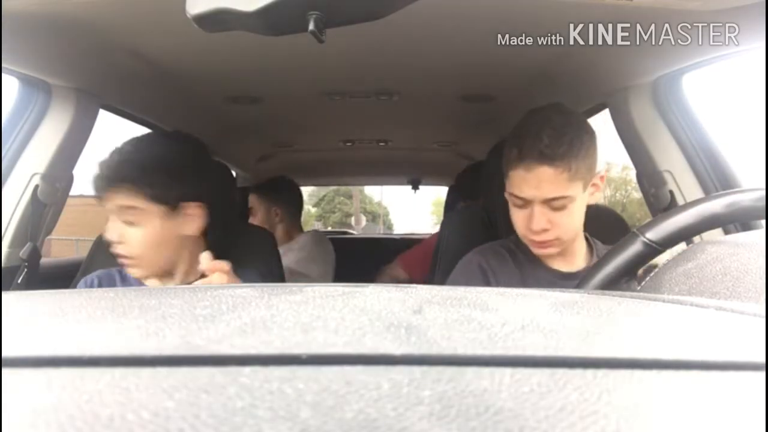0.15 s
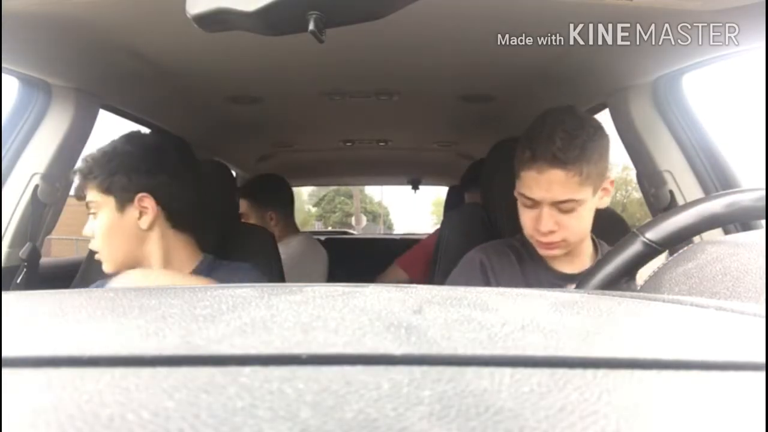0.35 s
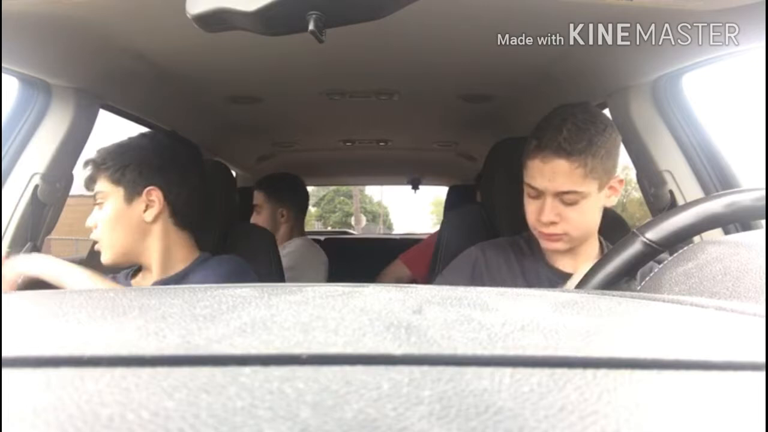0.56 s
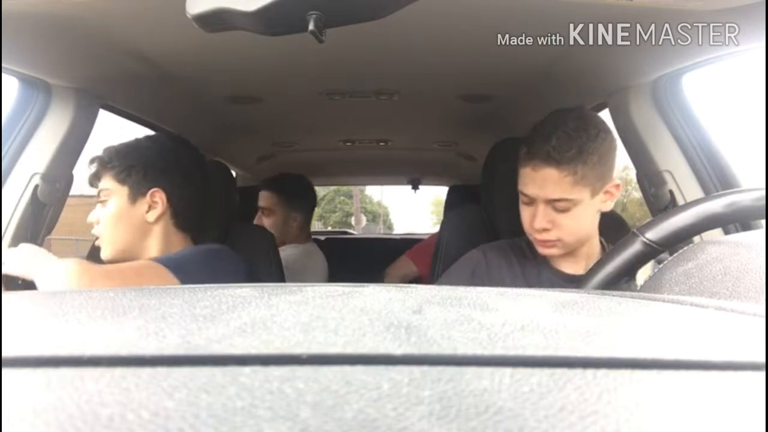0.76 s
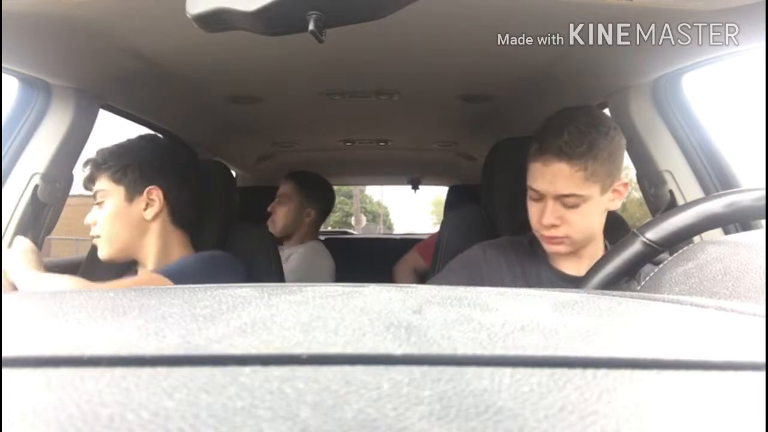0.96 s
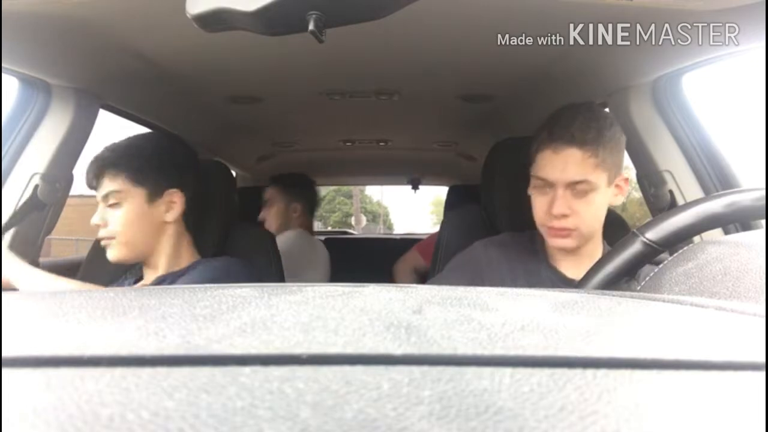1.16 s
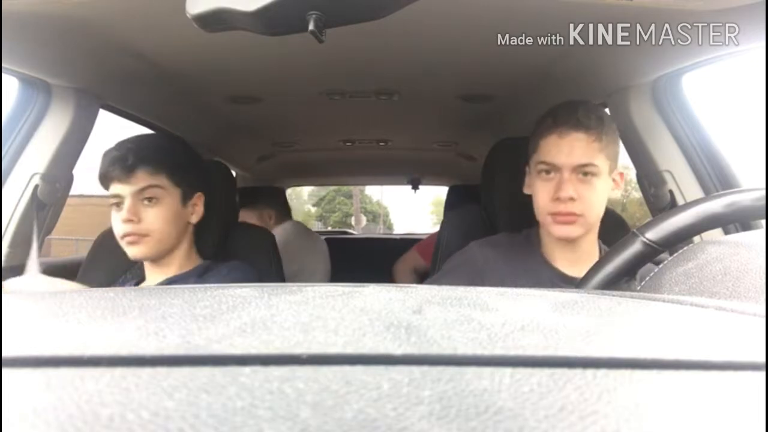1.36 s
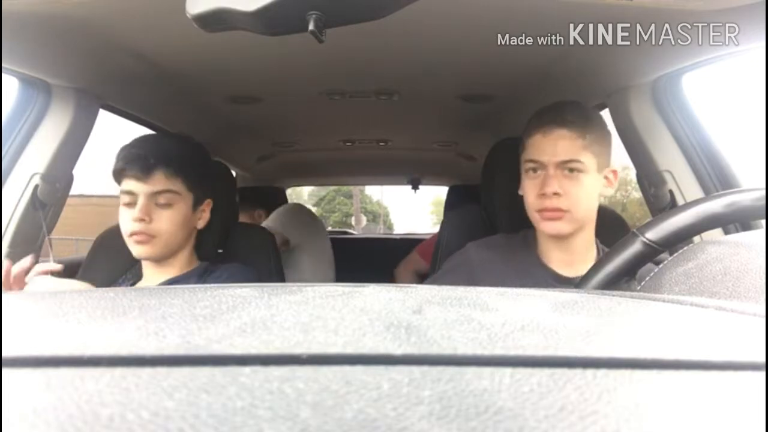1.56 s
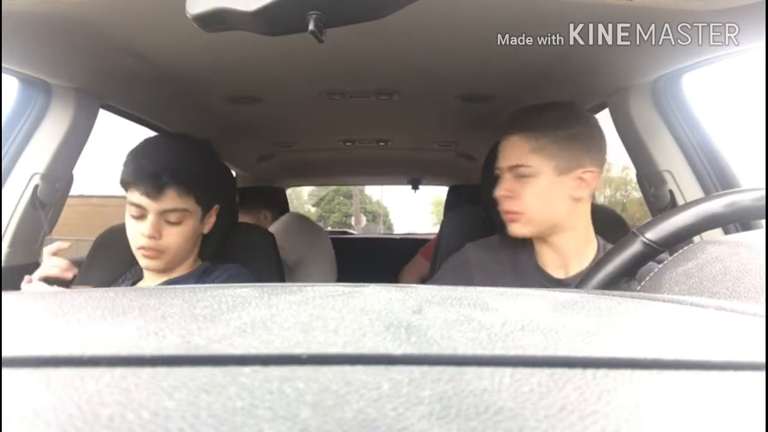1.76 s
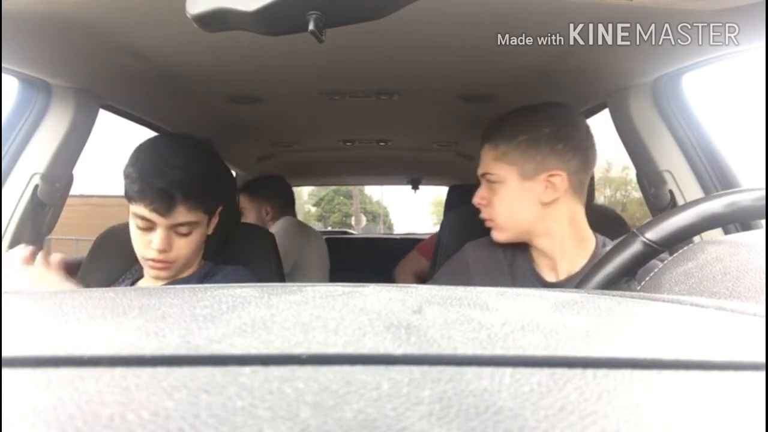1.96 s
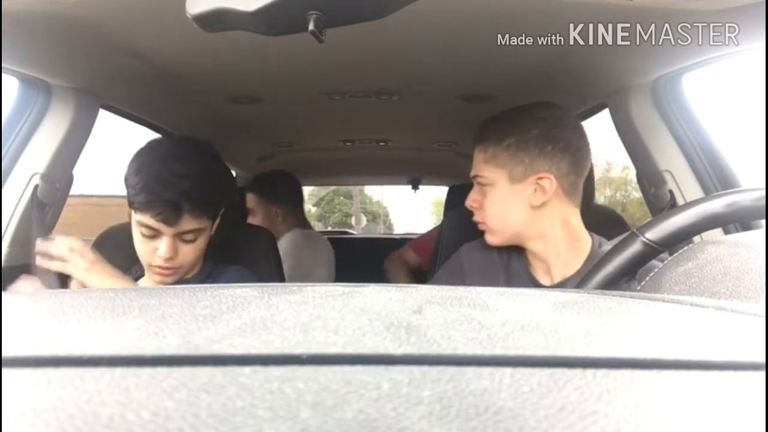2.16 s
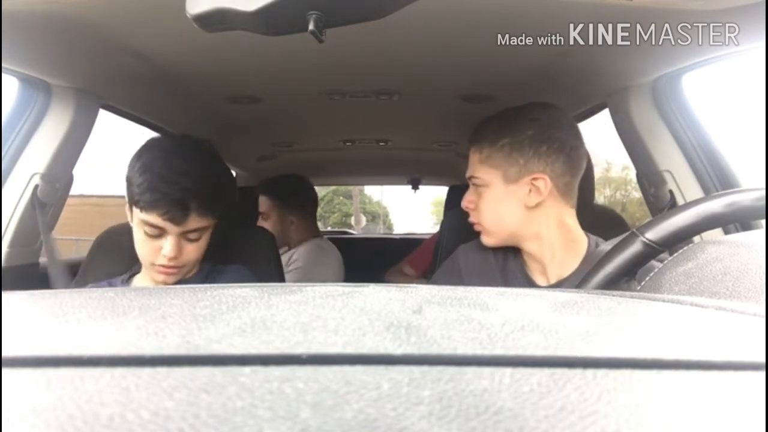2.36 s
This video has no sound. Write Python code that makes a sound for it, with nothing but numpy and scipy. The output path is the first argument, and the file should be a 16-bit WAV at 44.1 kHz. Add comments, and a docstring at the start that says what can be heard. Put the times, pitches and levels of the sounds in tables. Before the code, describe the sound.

Soft thumps and plastic knocks as people shift and pull seatbelts in a parked car.

```python
"""People shift in their seats in a parked car and pull out their seatbelts, over a steady low rumble.
At 0.2 s a soft thump rings the trim panels and booms in the closed cabin; light plastic knocks follow.
Near 0.5 s come a faint belt pull and a second thump; at 1.1 s, a third and a short rasp of webbing
jerking off its reel. From 1.3 to 2.3 s four more thumps fall among knocks and small buckle clicks."""
import sys
import numpy as np
from scipy.fft import rfft, irfft, next_fast_len
from scipy.io import wavfile
from scipy.ndimage import uniform_filter1d, minimum_filter1d, map_coordinates

SR = 44100
rng = np.random.default_rng(int(sys.argv[2]) if len(sys.argv) > 2 else 0)


def to_wav(s):
    """Save 16-bit WAV."""
    ch = np.atleast_2d(s).T  # columns
    pcm = np.round(np.clip(ch, -1, 1) * 32767)  # PCM
    wavfile.write(sys.argv[1], SR, pcm.astype(np.int16))


N = 112455
EVENT_N = SR // 2
EVENT_TIME_S = np.arange(EVENT_N) / SR


def amp(db):
    """Decibels to gain."""
    return 10 ** (np.asarray(db) / 20)


def unit_rms(x):
    """Scale to rms 1."""
    return x / np.sqrt(np.mean(x ** 2) + 1e-20)


def filtered(x, response):
    """Apply a frequency response, given as a function of Hz."""
    size = next_fast_len(len(x) + 8192)
    hz = np.fft.rfftfreq(size, 1 / SR)
    return irfft(rfft(x, size) * response(hz), size)[:len(x)]


def noise(spectrum, size):
    """Noise of rms 1, coloured by (Hz, dB) points on a log frequency axis."""
    points_hz, points_db = np.transpose(spectrum)
    colour = lambda hz: amp(np.interp(np.log(hz + 1), np.log(points_hz + 1), points_db))
    return unit_rms(filtered(rng.standard_normal(size), colour))


def envelope(rise_s, t60_s):
    """Soft rise, exponential decay."""
    rise = 1 - np.exp(-(EVENT_TIME_S / rise_s) ** 2)
    return rise * np.exp(-np.log(1000) * EVENT_TIME_S / t60_s)


def ring(modes, rise_s, pitch=1):
    """Damped modes of alternating sign, each varying by about 1 dB per blow."""
    out = np.zeros(EVENT_N)
    for k, (frequency, db, t60_s) in enumerate(modes):
        gain = (-1) ** k * amp(db + rng.standard_normal())
        out += gain * envelope(rise_s, t60_s) * np.sin(2 * np.pi * frequency * pitch * EVENT_TIME_S)
    return out


def burst(spectrum, rise_s, t60_s):
    """Decaying puff of coloured noise."""
    return noise(spectrum, EVENT_N) * envelope(rise_s, t60_s)


def add(out, time_s, x):
    """Mix x into out at time_s."""
    part = out[max(round(time_s * SR), 0):][:len(x)]
    part += x[:len(part)]


# cabin noise spectra (frequency [Hz], relative level [dB])
RUMBLE_SPECTRUM = [(20, -36.5), (30, -13.5), (42, 6.5), (55, 3), (100, 3.5), (135, 0.5), (190, -2.5),
                   (260, -7), (330, -7), (420, -8.5), (580, -10), (750, -28), (900, -15), (1030, -30),
                   (1200, -39), (2000, -88.5)]
HISS_SPECTRUM = [(600, -32.5), (850, 12), (1000, 11), (1130, -5), (1400, -4), (1700, -8.5), (2400, -9.5),
                 (3100, -15.5), (4300, -16.5), (4950, -21), (5500, -17), (7500, -21), (9600, -20.5),
                 (10300, -24.5), (11500, -24.5)]
def background(rumble_db=-38.5, hiss_db=-56.5):
    """Steady low cabin rumble and faint airy hiss."""
    return amp(rumble_db) * noise(RUMBLE_SPECTRUM, N) + amp(hiss_db) * noise(HISS_SPECTRUM, N)


# housing resonances (frequency [Hz], bandwidth [Hz], relative level [dB])
REEL_MODES = [(653, 80, -2.5), (970, 67, 4.5), (1390, 72, -10), (1830, 180, -6.5), (2080, 190, -9),
              (2400, 140, -13.5), (2950, 180, -19.5)]
def reel_housing(hz, cutoff_hz=3300):
    """Frequency response of the reel housing: resonances of alternating sign, low-passed."""
    response = 0
    for k, (centre_hz, width_hz, db) in enumerate(REEL_MODES):
        damping = 1j * hz * width_hz
        response += (-1) ** k * amp(db) * damping / (centre_hz ** 2 - hz ** 2 + damping)
    return response / np.sqrt(1 + (hz / cutoff_hz) ** 8)


# belt pulls (time [s], duration before release [s], level [dB])
BELT_PULLS = [(0.434, 0.12, -64), (1.103, .07, -45.5), (1.128, .036, -46), (1.59, 0.028, -61)]
def webbing(slips_per_s=2500, grip_changes_per_s=220, grip_spread_db=3, rise_s=0.028, t60_s=0.055):
    """The belt slips off its reel in tiny jerks under uneven grip, ringing the housing."""
    out, t = np.zeros(N), EVENT_TIME_S
    for time_s, duration_s, db in BELT_PULLS:
        slips = rng.standard_normal(EVENT_N) * (rng.random(EVENT_N) < slips_per_s / SR)
        grip_db = grip_spread_db * map_coordinates(rng.standard_normal(256), [t * grip_changes_per_s])
        rasp = unit_rms(filtered(slips * amp(grip_db), reel_housing))
        rise = np.minimum(t / rise_s, 1)
        release = np.exp(-np.log(1000) * np.maximum(t - duration_s, 0) / t60_s)
        add(out, time_s, amp(db) * rise * release * rasp)
    return out


# buckle clicks (time [s], level [dB], treble tilt [dB/octave])
BUCKLE_CLICKS = [(.629, -56, 0), (1.41, -55.5, -5), (1.418, -53.5, 0), (1.625, -54, 2), (1.7456, -46, 5.5),
                 (1.749, -45.5, -2), (1.761, -48, -3), (2.159, -45.5, 0.5), (2.287, -49.5, 1.5),
                 (2.318, -52, -1)]
# click noise (frequency [Hz], relative level [dB])
CLICK_SPECTRUM = [(500, -25.5), (1300, 20), (1900, 10.5), (2700, 10.5), (3500, -1.5), (4300, 1.5),
                  (6000, -8), (8500, -11.5), (9500, -21), (12000, -31.5)]
# latch plate (frequency [Hz], relative level [dB], t60 [s])
LATCH_MODES = [(1256, -2, 0.1), (1403, -8.5, 0.055), (2710, -10, 0.046), (3460, -15, 0.049)]
def buckles(rise_s=0.0019, tilt_pivot_hz=2500, latch_offset_db=-1.5):
    """Dry clicks of varied brightness, each briefly ringing the metal latch plate."""
    out = np.zeros(N)
    for time_s, db, tilt in BUCKLE_CLICKS:
        spectrum = [(hz, level + tilt * np.log2(hz / tilt_pivot_hz)) for hz, level in CLICK_SPECTRUM]
        add(out, time_s, amp(db) * burst(spectrum, rise_s, t60_s=0.045))
        add(out, time_s, amp(db + latch_offset_db) * ring(LATCH_MODES, rise_s))
    return out


# light blows (time [s], pitch [Hz], ring level [dB], contact level [dB])
PLASTIC_KNOCKS = [(.015, 567, -34.5, -56), (.2, 286, -12.5, -57.5), (0.224, 127, -13.5, -54),
                  (0.25, 142.5, -10.5, -54), (.262, 589, -30.5, -65.5), (.312, 125, -20.5, -75.5),
                  (.387, 568, -32, -62), (.43, 73.4, -25, -69), (0.549, 178, -18, -72),
                  (.735, 545, -30.5, -66), (1.051, 334, -18.5, -49.5), (1.08, 499, -24, -47.5),
                  (1.097, 428.5, -20.5, -39.5), (1.156, 410.5, -31.5, -58), (1.165, 70, -15.5, -64),
                  (1.258, 296, -20, -45.5), (1.261, 501, -24, -56.5), (1.296, 352, -25.5, -62),
                  (1.301, 585, -27.5, -57.5), (1.587, 510, -35, -49), (1.689, 547, -22, -41),
                  (1.759, 600, -30, -62), (1.785, 252.5, -16, -47.5), (1.965, 490, -29.5, -66),
                  (2.147, 566, -24.5, -51.5), (2.158, 569, -25, -41.5), (2.17, 74.3, -16.5, -59),
                  (2.175, 298, -27.5, -67), (2.209, 402, -22, -52), (2.259, 575, -28.5, -49.5)]
# hollow plastic (frequency [multiple of pitch], relative level [dB], t60 [s])
PLASTIC_MODES = [(.72, -6, 0.071), (1, 6.5, 0.063), (1.15, -7, 0.098), (1.55, -5, 0.044)]
# contact noise of knocks and thumps (frequency [Hz], relative level [dB])
CONTACT_SPECTRUM = [(200, -21.5), (700, 0), (1400, 4.5), (1700, -2), (2300, -2.5), (3100, -19.5),
                    (4400, -17.5), (5200, -34), (8000, -30.5), (12000, -45)]
def knocks():
    """Light blows on plastic: a short hollow ring plus contact noise."""
    out = np.zeros(N)
    for time_s, pitch_hz, ring_db, contact_db in PLASTIC_KNOCKS:
        add(out, time_s, amp(ring_db) * ring(PLASTIC_MODES, rise_s=0.0082, pitch=pitch_hz))
        add(out, time_s, amp(contact_db) * burst(CONTACT_SPECTRUM, rise_s=0.0036, t60_s=0.078))
    return out


# soft blows (time [s], low panel [dB], high panel [dB], boom [dB], rattle [dB], contact [dB])
TRIM_THUMPS = [(.187, -8.5, -12, -12, -17, -45), (0.525, -19.5, -26.5, -13, -21, -46.5),
               (1.063, -20, -19, -13, -14.5, -45), (1.341, -11.5, -11.5, -12.5, -21, -46.5),
               (1.792, -16.5, -20.5, -12.5, -20.5, -48), (1.995, -15, -16.5, -13, -22, -49.5),
               (2.218, -13, -20.5, -20, -26.5, -56)]
# trim panels and cabin air (frequency [Hz], relative level [dB], t60 [s])
LOW_PANEL_MODES = [(146, -8.5, 0.22), (186.7, -1.5, 0.11), (231.8, 1, 0.2), (264, -8.5, 0.24)]
HIGH_PANEL_MODES = [(342, 5.5, 0.077), (407.9, 1, 0.13), (448, -21.5, 0.36), (495, -10, 0.11),
                    (536, -7, 0.1), (593.7, -16.5, 0.16)]
CABIN_AIR_MODES = [(54.5, -4, 0.46), (68.8, 1.5, 0.19), (99.6, -4, 0.23)]
# trim rattle (frequency [Hz], relative level [dB])
RATTLE_SPECTRUM = [(40, -10.5), (100, -3.5), (170, -5), (300, -4.5), (480, -3.5), (600, -16), (760, -22),
                   (920, -24.5), (1100, -56.5), (1600, -52), (3000, -120)]
def thumps(scuff_lead_s=0.0081, scuff_offset_db=-10, panel_rise_s=0.011, boom_lag_s=0.01):
    """Cloth brushes the trim, the blow rings and rattles it, then the cabin air booms."""
    out = np.zeros(N)
    for time_s, low_db, high_db, boom_db, rattle_db, contact_db in TRIM_THUMPS:
        scuff = burst(CONTACT_SPECTRUM, rise_s=0.024, t60_s=0.057)
        add(out, time_s - scuff_lead_s, amp(contact_db + scuff_offset_db) * scuff)
        add(out, time_s, amp(low_db) * ring(LOW_PANEL_MODES, panel_rise_s))
        add(out, time_s, amp(high_db) * ring(HIGH_PANEL_MODES, panel_rise_s))
        add(out, time_s + boom_lag_s, amp(boom_db) * ring(CABIN_AIR_MODES, rise_s=0.021))
        add(out, time_s, amp(rattle_db) * burst(RATTLE_SPECTRUM, rise_s=0.0033, t60_s=0.26))
        add(out, time_s, amp(contact_db) * burst(CONTACT_SPECTRUM, rise_s=0.0023, t60_s=0.16))
    return out


def scene():
    """Mono mix, heard from the dashboard."""
    return (thumps() + knocks() + buckles() + webbing() + background())[None]


CEILING_DB, LIMITER_HOLD_S, BAND_LIMIT_HZ = -5, 0.012, 11900
def record(dry):
    """Peak limiter, then brick-wall low-pass."""
    x, hold_n = dry[0], int(LIMITER_HOLD_S * SR)
    needed_gain = np.minimum(1, amp(CEILING_DB) / (np.abs(x) + 1e-9))
    held_gain = minimum_filter1d(needed_gain, hold_n)
    smooth_gain = uniform_filter1d(held_gain, hold_n)
    return filtered(x * smooth_gain, lambda hz: hz < BAND_LIMIT_HZ)[None]


dry = scene()
out = record(dry)
to_wav(out)
```